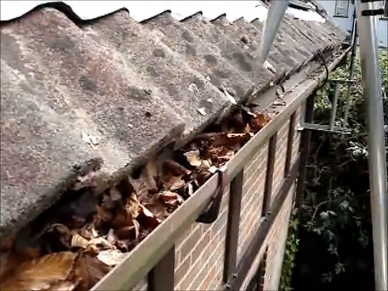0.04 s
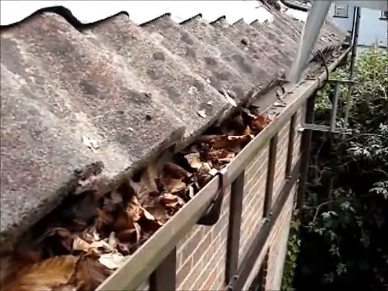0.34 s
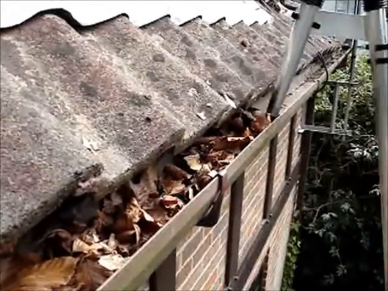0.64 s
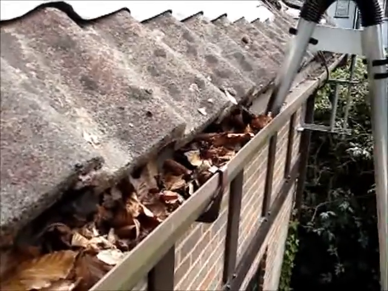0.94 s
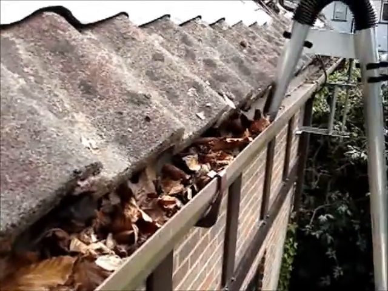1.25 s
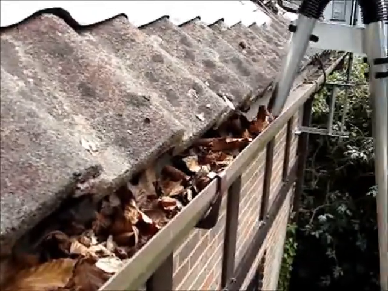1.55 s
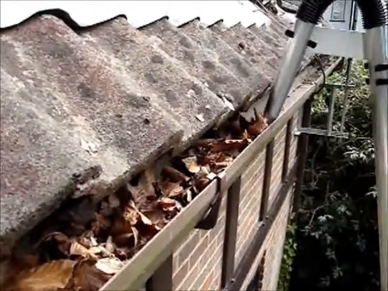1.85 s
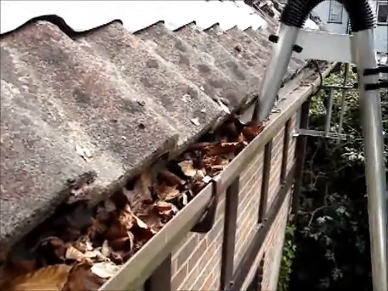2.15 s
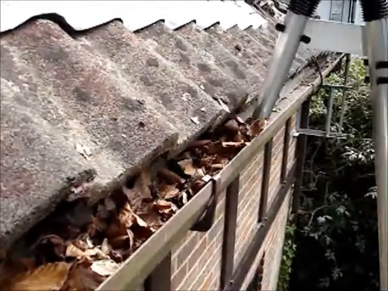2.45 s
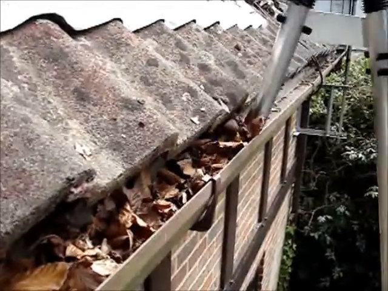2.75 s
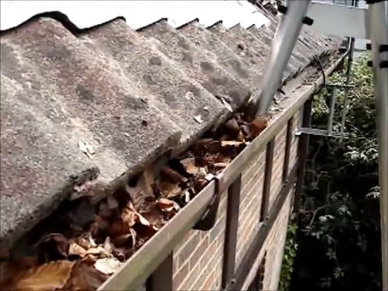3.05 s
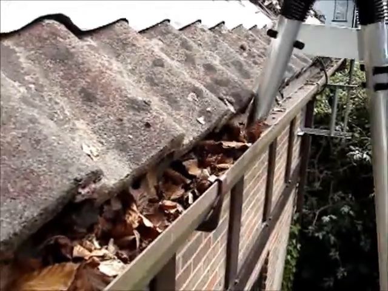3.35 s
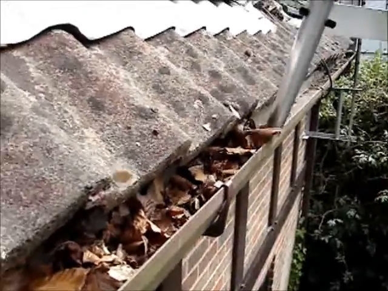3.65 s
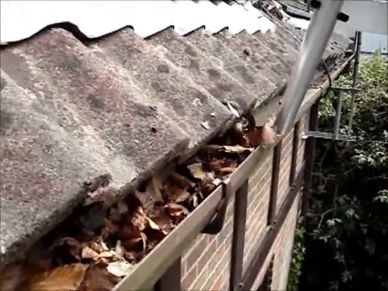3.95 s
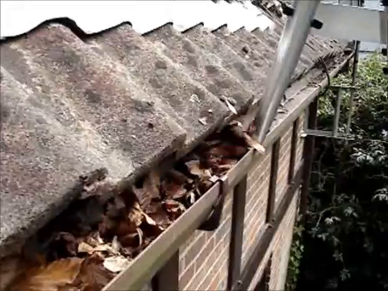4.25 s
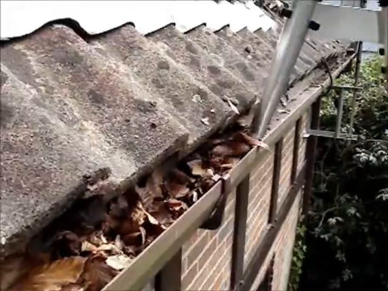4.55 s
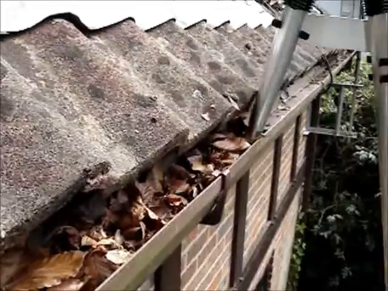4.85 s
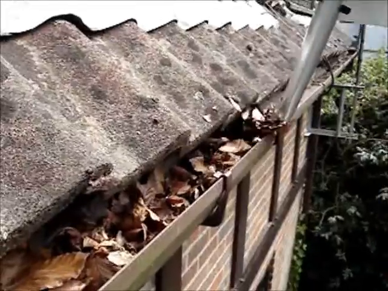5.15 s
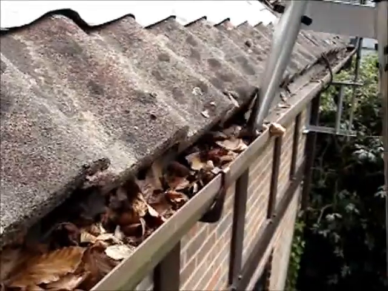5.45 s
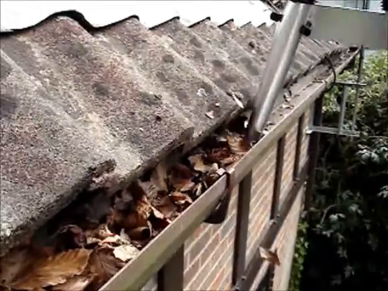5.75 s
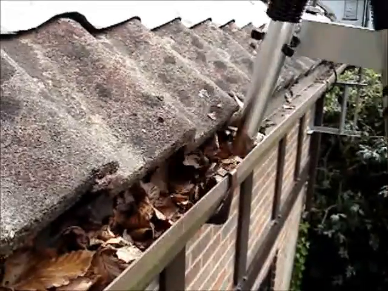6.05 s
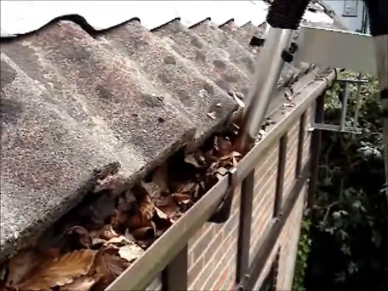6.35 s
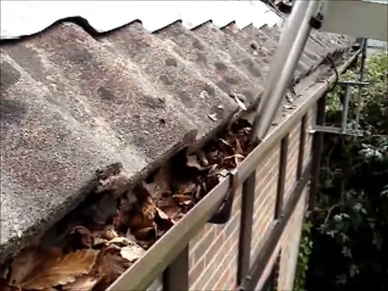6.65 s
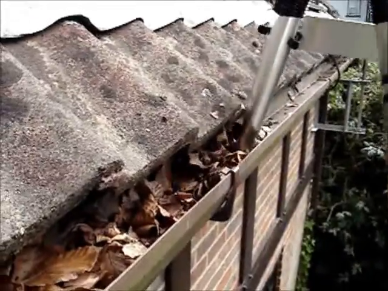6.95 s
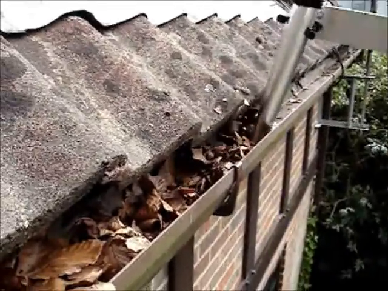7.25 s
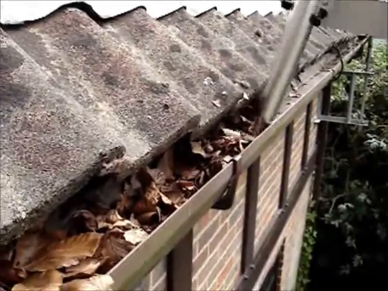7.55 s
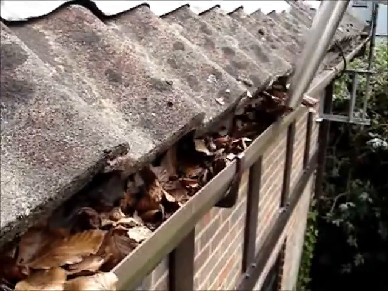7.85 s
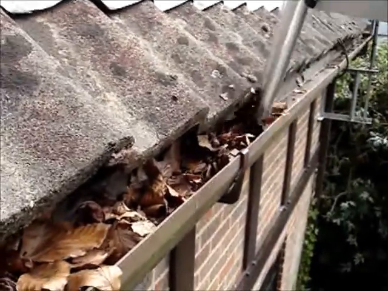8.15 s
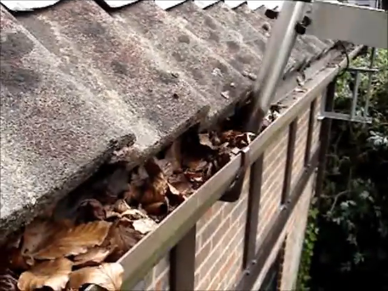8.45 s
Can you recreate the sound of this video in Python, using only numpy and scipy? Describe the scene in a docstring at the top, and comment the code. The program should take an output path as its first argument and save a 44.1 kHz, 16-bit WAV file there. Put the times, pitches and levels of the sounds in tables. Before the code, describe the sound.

A vacuum rushes and hisses as it sucks dry leaves from a gutter, with crackles and rattles down its metal tube.

```python
"""A rush of air, a hiss and the snap of dry leaves: a vacuum clears a roof gutter, close by, outdoors.
Air tears past the leaves at the mouth of the metal tube; now and then it whistles on a leaf edge or
sounds the open tube. The rush sinks whenever the nozzle is lifted. Leaves crackle, are torn loose and
rattle down the tube, the nozzle bumps the gutter, and the motor hums below. One microphone, no echo."""
import sys
import numpy as np
from scipy import signal
from scipy.fft import rfft, irfft, next_fast_len
from scipy.io import wavfile

SR = 44100
rng = np.random.default_rng(int(sys.argv[2]) if len(sys.argv) > 2 else 0)


def store_wav(level_fs):
    """Save 16-bit WAV to argv[1]."""
    pcm = np.round(np.clip(np.atleast_2d(level_fs), -1, 1) * 32767)
    wavfile.write(sys.argv[1], SR, pcm.T.astype(np.int16))


N = 375291
TIME = np.arange(N) / SR

# Table levels are relative: each source adds its own gain.
# draught with the nozzle down in the leaves: t/s, jet/dB, hollow rush/dB, treble hiss/dB
DRAUGHT_LEVELS = [(0, -17.5, -24, -29), (.22, -23, -28, -29.5), (1.19, -21.5, -19.5, -28.5),
                  (1.33, -26, -26.5, -29.5), (1.48, -21.5, -19.5, -28), (1.72, -25.5, -24.5, -30.5),
                  (2.4, -23.5, -23, -32), (2.93, -27, -26.5, -33), (3.3, -25, -23.5, -31),
                  (3.68, -26.5, -33, -34), (3.98, -24.5, -29, -34), (4.4, -26, -34, -33),
                  (4.9, -21.5, -27, -27), (5.55, -24.5, -29.5, -31), (6.25, -20, -28.5, -28.3),
                  (6.8, -24.5, -35, -33), (7.2, -23.2, -31, -27.5), (7.9, -25, -39.5, -29.5),
                  (8.51, -24, -26, -27.5)]
# resonance of the gap between nozzle and leaves: t/s, f/Hz, share of the jet ringing in it/0-1
GAP_RESONANCE = [(0, 2420, 0.32), (.5, 3040, 0.47), (1.4, 3460, 0), (2.3, 4240, 0.1), (3.45, 3790, 0),
                 (3.68, 2660, 0.22), (4.1, 2740, 0.43), (4.55, 2980, .45), (4.95, 3800, 0.63),
                 (5.17, 2780, .35), (5.5, 3100, 0.19), (5.68, 3850, 0.65), (5.85, 2960, 0.65),
                 (6.4, 3410, 0.34), (6.7, 2970, .4), (6.98, 3760, 0.4), (7.6, 3530, .35),
                 (7.85, 2710, 0.27), (8.51, 3700, 0.02)]
# the nozzle pulls clear of the leaves: t/s, length/s, drop/dB
NOZZLE_LIFTS = [(0.247, 0.463, 11), (0.736, 0.046, 10.5), (1.507, 0.17, 3.5), (1.87, 0.291, 7),
                (5.08, 0.23, 4.5), (5.461, 0.14, 2), (6.645, .14, 2.5), (8.21, 0.13, 1.5)]
# leaves are drawn in, narrow the mouth and rattle away: t/s, length/s, rattle/dB, air surge/dB
MOUTHFULS = [(.42, 0.059, -32, 3.5), (.63, 0.07, -27, 0), (0.793, 0.019, -20, 0), (1.238, 0.027, -24.5, 0),
             (1.507, 0.041, -23.5, 0), (1.724, 0.17, -28.5, 2), (2.09, 0.078, -30, 2),
             (2.194, .11, -29, 1.5), (2.297, 0.25, -22.5, -2), (2.659, 0.037, -19, 4.5),
             (2.727, 0.46, -26.5, -2), (3.244, 0.19, -23, 2), (3.472, 0.13, -23.5, 1.5),
             (3.648, 0.017, -32, 3), (4.115, 0.15, -21.5, 3), (4.432, 0.43, -26.5, 0),
             (5.015, 0.069, -20, -2.5), (5.32, 0.12, -23, -0.5), (5.448, 0.016, -21.5, 0.5),
             (5.568, 0.068, -26.5, 2), (5.723, .18, -23, -1.5), (6.099, 0.19, -27, -1.5),
             (6.497, .11, -23.5, 0), (6.798, 0.041, -27, -1), (8.083, .07, -29, 1.5),
             (8.397, .11, -25, 0.5)]
# spectrum of the free jet: f/Hz, density/dB
JET_SPECTRUM = [(1000, -35.5), (2250, -12.5), (2650, -4), (3300, -2.5), (4400, -1.5), (5000, -3.5),
                (5700, -9.5), (9000, -34.5)]
# spectrum of the treble hiss: f/Hz, density/dB
HISS_SPECTRUM = [(1000, -32), (2500, -14), (4000, -8), (4900, -6), (5500, 0.5), (6900, 1.5), (8300, 0),
                 (10000, -5.5)]
# air column at the mouth: f/Hz, width/Hz, level/dB
MOUTH_MODES = [(1277, 280, -0.5), (1642, 143, 2), (1967, 420, -2)]
# open tube drawing air: f/Hz, width/Hz, level/dB
PIPE_MODES = [(1420, 90, -6), (1873, 160, -1), (2450, 176, 0), (3130, 185, -0.5), (3550, 68, 1),
              (4265, 110, -3.5), (5410, 100, -13.5)]
# scraps trickling down the tube between mouthfuls: t/s, level/dB
TRICKLE_LEVELS = [(0, -31), (1.15, -31), (2.1, -29.5), (3.8, -27), (5.2, -31), (6.8, -29), (7.3, -31.5),
                  (8.51, -30.5)]
# tube struck by leaves: f/Hz, width/Hz, level/dB
STRUCK_TUBE_MODES = [(609, 165, -5), (712, 99, 2.5), (835, 105, -3.5), (1114, 111, -7.5), (1487, 135, -13)]
# spectrum of the dull rumble under the leaves: f/Hz, density/dB
RUMBLE_SPECTRUM = [(20, -14.5), (60, -17), (130, -12), (220, -5), (310, -0.5), (500, 4.5), (700, -13.5),
                   (1200, -39)]
# clumps hitting the tube wall: t/s, level/dB
CLUMP_HITS = [(.704, -7.5), (.812, -10), (1.26, -5), (1.521, -7.5), (1.838, -7.5), (1.88, -9), (2.253, -9),
              (2.302, -3), (2.331, -3), (2.388, -15), (2.679, -9), (2.812, -5), (2.968, -11), (3.281, -7),
              (3.348, -5), (3.391, -6), (3.477, -10), (3.518, -7.5), (3.667, -10), (4.247, -15),
              (4.444, -6), (4.654, -11), (5.028, -8), (5.082, -8), (5.148, -9.5), (5.332, -7),
              (5.451, -1.5), (5.743, -11), (5.798, -6.5), (5.885, -6), (5.902, -7.5), (6.131, -7),
              (6.294, -9.5), (6.483, -3.5), (6.573, -8), (6.6, -12), (6.633, -5.5)]
# dry leaves and twigs snapping: t/s, level/dB
LEAF_SNAPS = [(.141, -2.5), (.211, -2), (.434, -7), (.704, -7), (.77, -8), (.803, -3), (1.523, -7),
              (2.193, -15), (2.283, -15), (2.667, -8), (3.532, -9), (3.655, -5), (4.114, -3.5), (4.48, -8),
              (4.565, -6), (4.593, -6), (5.148, -19), (5.418, -4), (5.452, -20), (5.742, -2), (5.799, -4.5),
              (6.363, -7), (6.528, -2), (6.795, -4), (7.344, -7), (7.684, -5.5)]
# nozzle bumping the gutter: t/s, level/dB
GUTTER_BUMPS = [(.559, -34), (1.86, -41), (2.309, -33), (3.279, -37), (3.344, -43), (4.14, -36),
                (4.175, -35), (4.205, -36), (4.245, -41), (5.03, -44), (5.455, -41), (5.739, -47),
                (6.481, -31), (6.631, -37), (6.81, -49), (7.344, -36), (8.214, -30)]
# nozzle tapping an edge: t/s, level/dB
EDGE_TAPS = [(.728, -26), (3.625, -23), (4.481, -19.5), (5.148, -28), (5.458, -16), (6.633, -25),
             (7.68, -26), (8.216, -24.5)]
# ringing metal of the nozzle: f/Hz, level/dB, t60/s
NOZZLE_MODES = [(2390, 3, 0.041), (2650, -4.5, 0.033), (3180, -20, 0.0091)]
# short gliding whistles on leaf edges and long breathy tones of the open tube:
# t/s, length/s, start f/Hz, end f/Hz, level/dB, width/Hz
WHISTLE_TONES = [(0.248, 0.71, 2435, 2435, -37, 60), (0.812, .4, 1325, 1310, -30, 35),
                 (1.257, .024, 732, 1014, -12.5, 9.7), (1.263, 0.025, 1736, 2100, -18, 120),
                 (1.4, 0.051, 1364, 1234, -22, 25), (1.83, 0.025, 3550, 3320, -19.5, 110),
                 (1.852, 0.025, 1320, 1100, -11, 18), (3.357, .07, 3880, 4420, -20, 420),
                 (3.683, 0.49, 2500, 2650, -30, 150), (4.279, .025, 5770, 5950, -20, 250),
                 (4.293, 0.12, 7260, 6750, -27, 770), (4.311, 0.022, 6000, 5630, -22, 300),
                 (4.354, .044, 5600, 5580, -19, 480), (5.511, .055, 1320, 1160, -27, 29),
                 (5.607, 0.022, 1490, 1454, -22, 45), (5.901, .1, 2666, 2590, -21.5, 8),
                 (6.124, 0.14, 1308, 1310, -22, 26), (7.64, 0.037, 1570, 1820, -27, 120),
                 (7.72, 0.5, 2686, 2600, -31.5, 144)]
# motor below the gutter: t/s, f/Hz, level/dB
MOTOR_HUM = [(0, 426, -32.5), (.22, 428.6, -38.5), (.72, 425, -31), (1, 426.5, -35), (1.35, 433, -39.5),
             (1.7, 436, -36.5), (2.35, 425, -37), (2.8, 432, -36), (3.2, 428, -30.5), (3.41, 427, -35.5),
             (4.1, 427.7, -28), (4.19, 425, -35.5), (5.9, 428.3, -35.5), (6.47, 430, -40.5),
             (7.02, 428.7, -36), (8.51, 431.3, -36.5)]

LIFT_EDGES_S, MOUTHFUL_EDGES_S = (0.028, 0.023), (0.012, 0.039)   # attack, release
GAP_WIDTH_HZ, GAP_REST_HZ = 1150, 3280   # the gap's bandwidth, and its note at an ordinary opening
RUSH_SURGE, HISS_SURGE = 1.16, 0.67   # multiples of the jet's surge in dB
JET_DROP = 1.22   # multiple of a lift's drop in dB
PIPE_FLOOR_DB, PIPE_UNDER_JET_DB, PIPE_DB_PER_OCTAVE = -41.5, -13, 6
RUMBLE_DB, RUMBLE_FADE_DB_PER_S = -49, 2.2
CUTOFF_HZ = 10000


def air():
    """Turbulence at the nozzle sinks at each lift, surges with mouthfuls and is shaken by leaves."""
    jet_db, rush_db, hiss_db = in_time(DRAUGHT_LEVELS)
    gap_hz, gap_share = in_time(GAP_RESONANCE)
    drop_db = sum(db * swell(s, length, *LIFT_EDGES_S) for s, length, db in NOZZLE_LIFTS)
    surge_db = sum(db * swell(s, length, *MOUTHFUL_EDGES_S) for s, length, _, db in MOUTHFULS)
    jet_db += surge_db
    rush_db += RUSH_SURGE * surge_db - choke_db() + 0.83 * drift(35)
    hiss_db += HISS_SURGE * surge_db + 0.83 * drift(70) + 0.51 * drift(18)
    rush_noise, jet_noise, hiss_noise, pipe_noise, gap_noise = rng.standard_normal((5, N))
    mouth = resonate(rush_noise + 0.5 * grains(900, spread_db=3.5), MOUTH_MODES)
    rush = unit(band(mouth, 820, 2810))
    free_jet = coloured(jet_noise + 0.22 * grains(1200, spread_db=5), JET_SPECTRUM)
    # a narrow gap gathers the jet into a hollow, half-whistling note
    gap_note = moving_resonance(gap_noise, gap_hz, GAP_WIDTH_HZ)
    gap_note = unit(moving_resonance(gap_note, gap_hz, GAP_WIDTH_HZ))
    jet = np.sqrt(1 - gap_share) * free_jet + np.sqrt(gap_share) * gap_note
    hiss = coloured(hiss_noise + 0.25 * grains(480, spread_db=1.5), HISS_SPECTRUM)
    stream = (from_db(rush_db - drop_db - 4) * rush
              + from_db(jet_db - JET_DROP * drop_db - 1.5) * jet
              + from_db(hiss_db - drop_db + 2.13) * hiss)
    flutter_db = 0.5 * drift(45) + 1.22 * drift(260)
    return stream * from_db(flutter_db) + pipe(pipe_noise, jet_db - drop_db, gap_hz)


def pipe(noise, jet_db, gap_hz):
    """The tube sings softly on its own draught, louder as the jet grows or the gap's note falls."""
    sing_db = jet_db + PIPE_UNDER_JET_DB - PIPE_DB_PER_OCTAVE * np.log2(gap_hz / GAP_REST_HZ)
    return (from_db(PIPE_FLOOR_DB) + from_db(sing_db)) * unit(resonate(noise, PIPE_MODES))


def choke_db():
    """One leaf briefly plugs the mouth, damping the hollow rush and the tumbling scraps."""
    return 10 * swell(start=2.6, length=0.057, attack_s=0.014, release_s=0.014)


def leaves():
    """Scraps tumble down the tube, in a trickle and a flurry for each mouthful, over a dull rumble."""
    trickle_db, = in_time(TRICKLE_LEVELS)
    flurry_power = sum((from_db(db) * swell(s, length, *MOUTHFUL_EDGES_S)) ** 2
                       for s, length, db, _ in MOUTHFULS)
    level = np.sqrt(from_db(trickle_db) ** 2 + flurry_power) * from_db(-choke_db())
    ticks = grains(450, spread_db=-0.5) + 0.55 * rng.standard_normal(N)
    scraps = unit(ticks * from_db(1.35 * drift(70)))
    rattle = level * unit(struck_tube(scraps))
    rumble_level = level * from_db(-18) + from_db(RUMBLE_DB - RUMBLE_FADE_DB_PER_S * TIME)
    return rattle + rumble_level * coloured(scraps + rng.standard_normal(N), RUMBLE_SPECTRUM)


def struck_tube(x):
    """The hollow tube rings briefly and radiates little bass."""
    return band(resonate(x, STRUCK_TUBE_MODES), 293, 3500)


def clumps():
    """A clump knocks on the tube wall and crunches as it breaks up."""
    knock = strikes(CLUMP_HITS, struck_tube)
    envelope = strikes(CLUMP_HITS, lambda x: decay(x, t60_s=0.014))
    crunch = envelope * unit(band(grains(9000, spread_db=2.5), 800, 4300, order=1))
    return from_db(-5) * knock + from_db(-12.5) * crunch


def snaps():
    """A dry leaf or twig breaks with a sharp, bright burst that dies quickly."""
    envelope = strikes(LEAF_SNAPS, lambda x: decay(x, t60_s=0.055))
    return from_db(-13) * envelope * unit(band(rng.standard_normal(N), 780, 3700, order=1))


def nozzle():
    """Soft bumps thud in the gutter; hard taps make the metal ring."""
    thud = strikes(GUTTER_BUMPS, lambda x: band(band(x, 25, 350, order=1), 20, 600))
    metal = [(hz, np.log(1000) / (np.pi * t60), db) for hz, db, t60 in NOZZLE_MODES]
    ring = strikes(EDGE_TAPS, lambda x: resonate(x, metal))
    return from_db(7.5) * thud + from_db(8) * ring


def whistles():
    """Short whistles glide on leaf edges and the open tube holds long breathy tones; both waver."""
    out = np.zeros(N)
    for s, length, start_hz, end_hz, db, width_hz in WHISTLE_TONES:
        at, count = round(s * SR), int(length * SR)
        glide = np.cumsum(np.linspace(start_hz, end_hz, count)) * 2 * np.pi / SR
        waver = band(rng.standard_normal(count), 2.7, 510, order=1)
        blur = np.cumsum(waver) * np.sqrt(2 * np.pi * width_hz / SR)
        envelope = np.sqrt(np.abs(np.sin(np.linspace(0, np.pi, count))))
        out[at:at + count] += from_db(db) * envelope * np.sin(glide + blur)
    return out


def motor():
    """From below the gutter comes the rotor's once-a-turn hum, trembling a little."""
    hz, level_db = in_time(MOTOR_HUM)
    phase = 2 * np.pi * np.cumsum(hz + 0.64 * drift(18)) / SR
    return np.sqrt(2) * from_db(level_db - 1.5 + 0.8 * drift(25)) * np.sin(phase)


def from_db(db):
    """Decibels as amplitude."""
    return 10 ** (np.asarray(db) / 20)


def unit(x):
    """Scale to rms 1."""
    return x / (np.std(x) + 1e-12)


def in_time(rows):
    """Each column of a curve at every sample."""
    s, *columns = np.transpose(rows)
    return [np.interp(TIME, s, column) for column in columns]


def swell(start, length, attack_s, release_s):
    """Attack, hold and release, from 0 to 1 and back."""
    rise = (TIME - start) / attack_s
    fall = 1 - (TIME - start - length) / release_s
    return np.clip(np.minimum(rise, fall), 0, 1)


def drift(per_s):
    """A smooth random wander that changes per_s times a second; rms 1."""
    slow = signal.resample_poly(rng.standard_normal(12000), 4, 1)
    return unit(np.interp(TIME * per_s * 4, np.arange(len(slow)), slow))


def grains(per_s, spread_db):
    """Random clicks of uneven size; rms 1."""
    sizes = from_db(spread_db * np.minimum(rng.exponential(1, N), 4))
    signs = rng.choice([-1, 1], N)
    return unit(sizes * signs * (rng.random(N) < per_s / SR))


def strikes(events, body):
    """Each event clicks into a body, whose answer peaks at the event's level."""
    clicks = np.zeros(N)
    for s, db in events:
        clicks[round(s * SR)] = from_db(db)
    return body(clicks) / np.abs(body(signal.unit_impulse(SR // 10))).max()


def decay(x, t60_s):
    """Give each click a tail that falls 60 dB in t60_s."""
    return signal.lfilter([1], [1, -from_db(-60 / (t60_s * SR))], x + 1e-18)


def band(x, low_hz, high_hz, order=2):
    """Band-pass filter."""
    sos = signal.butter(order, [low_hz, high_hz], "band", fs=SR, output="sos")
    return signal.sosfilt(sos, x + 1e-18)


def coloured(x, spectrum):
    """Give a steady sound a spectrum; rms 1."""
    hz, db = np.transpose(spectrum)
    size = next_fast_len(N)
    bins_hz = np.maximum(np.fft.rfftfreq(size, 1 / SR), 1)
    gain = from_db(np.interp(np.log(bins_hz), np.log(hz), db))
    return unit(irfft(rfft(x, size) * gain, size)[:N])


def resonate(x, modes):
    """Parallel resonances with alternating signs."""
    out = 0
    for k, (hz, width_hz, db) in enumerate(modes):
        radius = np.exp(-np.pi * width_hz / SR)
        poles = [1, -2 * radius * np.cos(2 * np.pi * hz / SR), radius ** 2]
        gain = (-1) ** k * from_db(db) * (1 - radius ** 2) / 2
        out = out + gain * signal.lfilter([1, 0, -1], poles, x + 1e-18)
    return out


def moving_resonance(x, hz, width_hz, block=256):
    """One resonance whose centre follows a curve."""
    out, state = np.zeros(N), np.zeros(2)
    radius = np.exp(-np.pi * width_hz / SR)
    for i in range(0, N, block):
        poles = [1, -2 * radius * np.cos(2 * np.pi * hz[i] / SR), radius ** 2]
        out[i:i + block], state = signal.lfilter([1, 0, -1], poles, x[i:i + block], zi=state)
    return out


def scene():
    """Everything reaches one microphone in the open air, alike on both channels."""
    mono = air() + leaves() + clumps() + snaps() + nozzle() + whistles() + motor()
    return np.tile(mono, (2, 1))


def record(dry):
    """The microphone chain rounds the peaks and cuts the top."""
    rounded = 1.029 * np.tanh(dry / 0.91)
    return signal.sosfilt(signal.ellip(12, 0.1, 80, CUTOFF_HZ, fs=SR, output="sos"), rounded)


dry = scene()
out = record(dry)
store_wav(out)
```